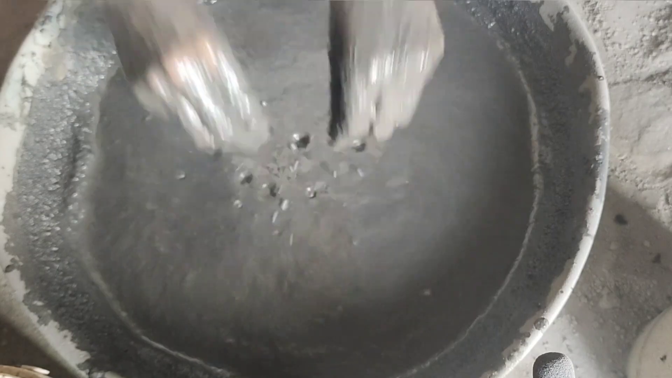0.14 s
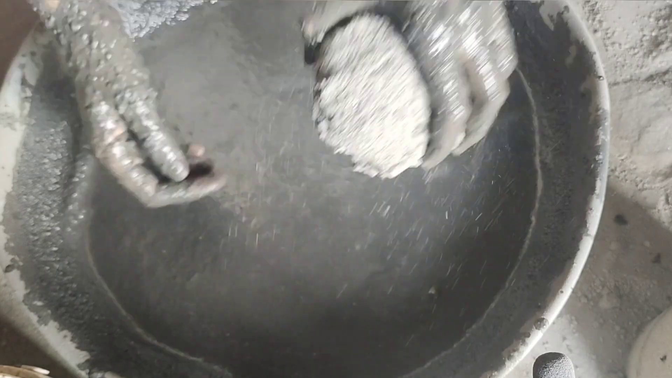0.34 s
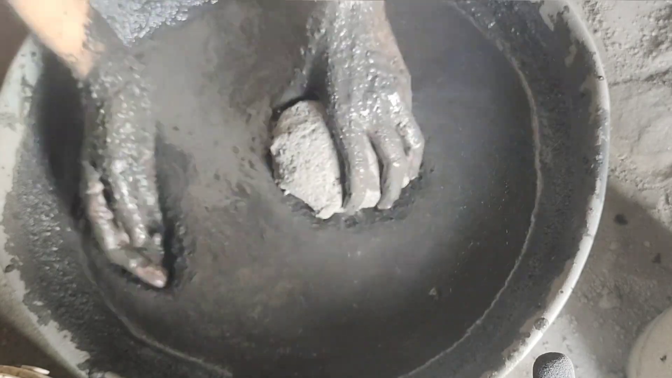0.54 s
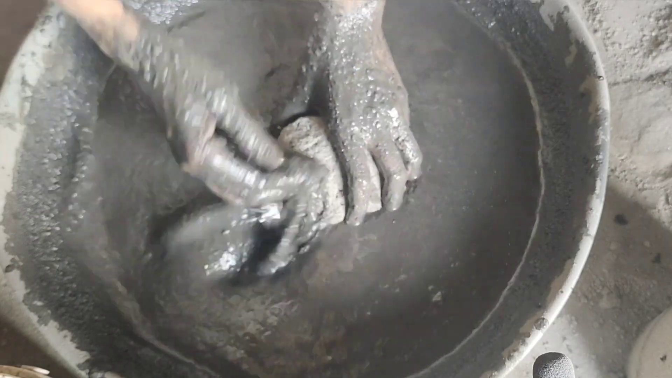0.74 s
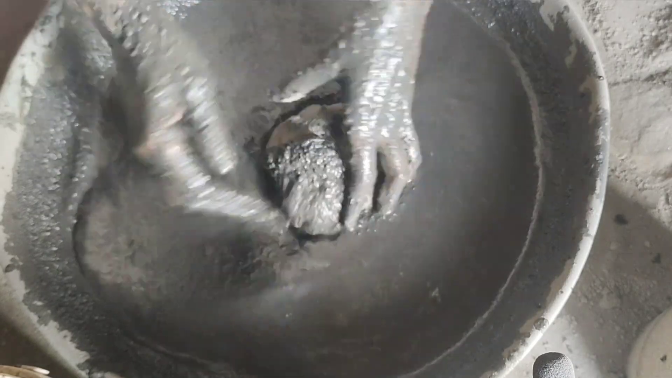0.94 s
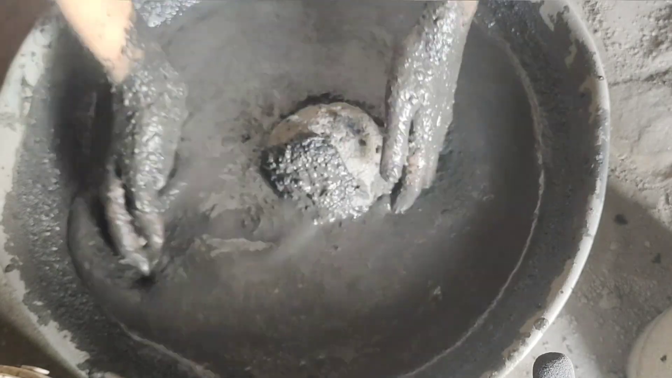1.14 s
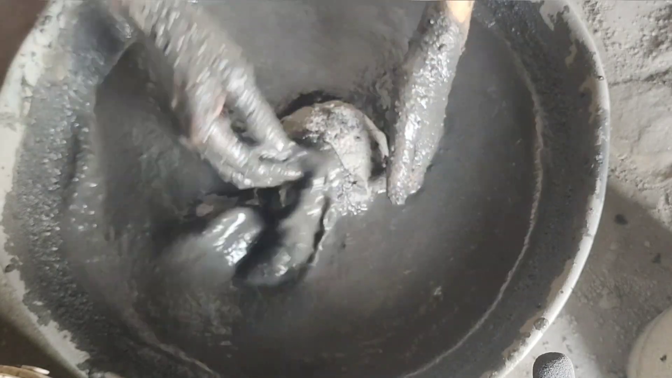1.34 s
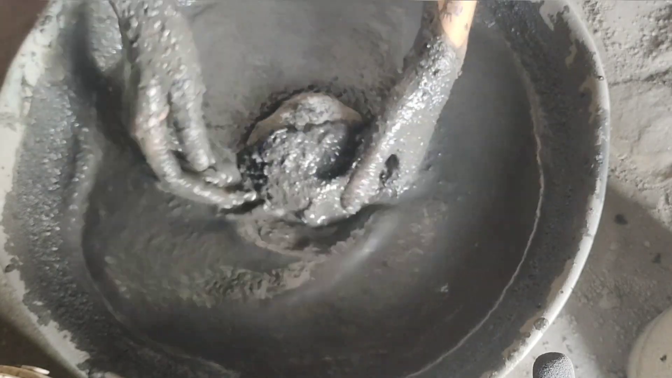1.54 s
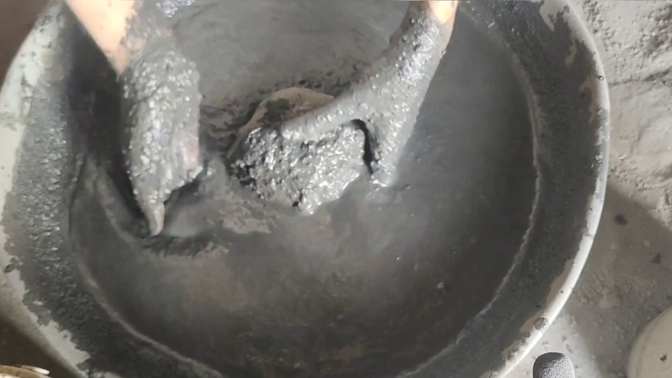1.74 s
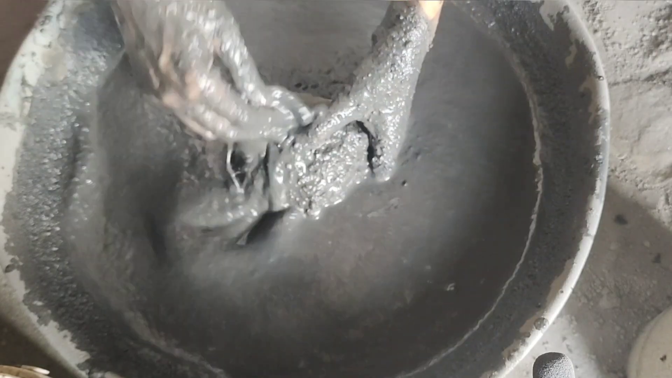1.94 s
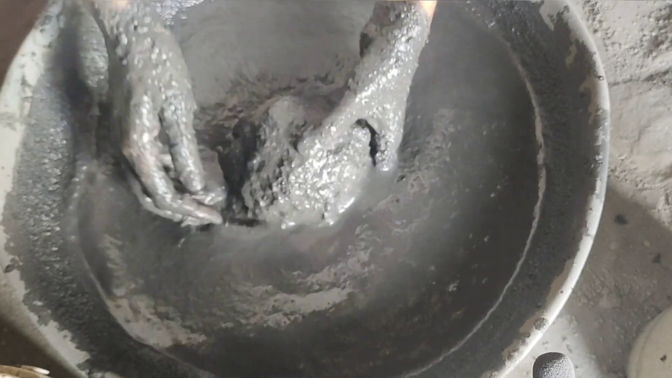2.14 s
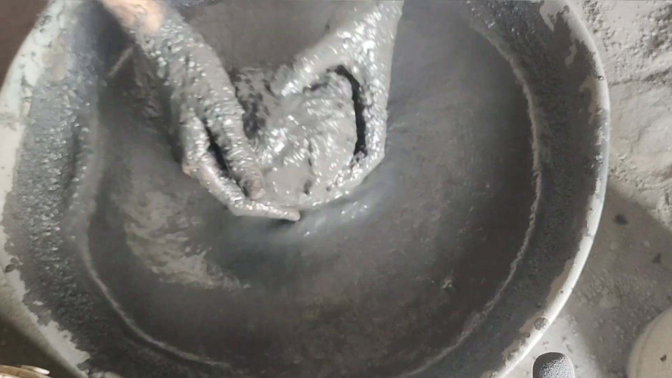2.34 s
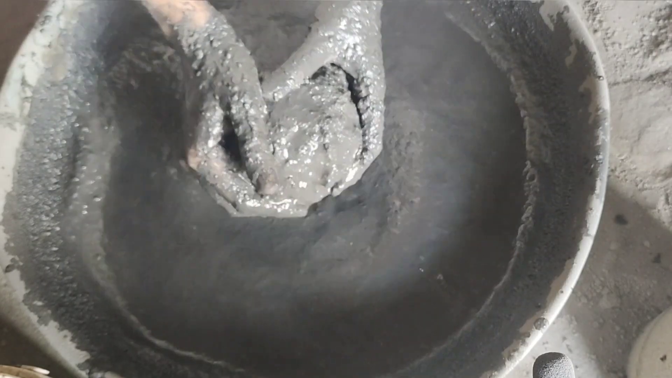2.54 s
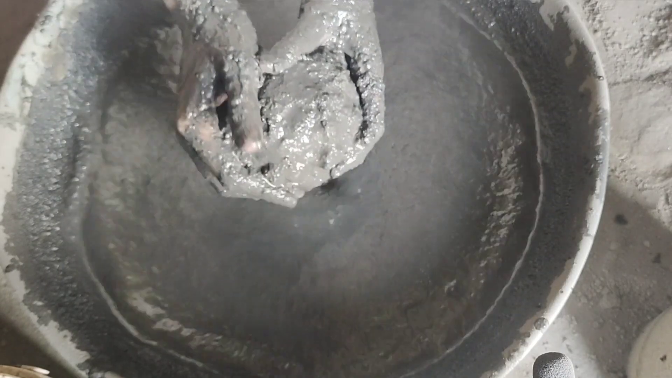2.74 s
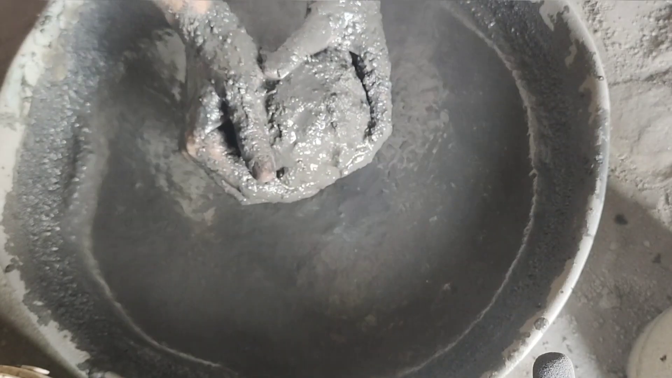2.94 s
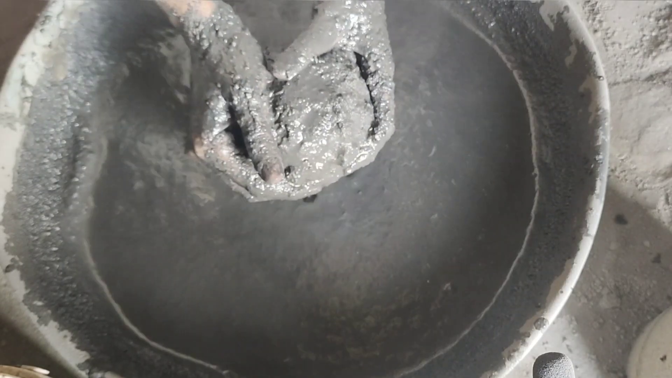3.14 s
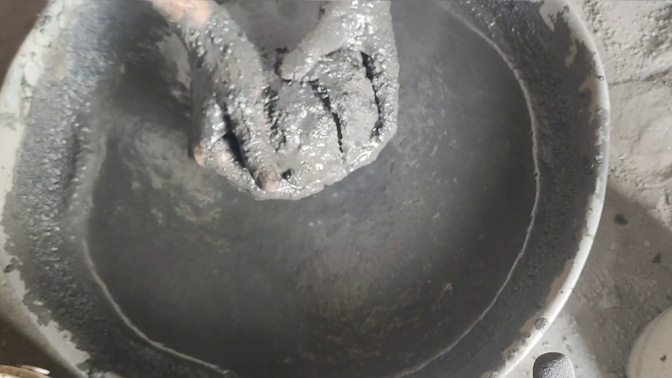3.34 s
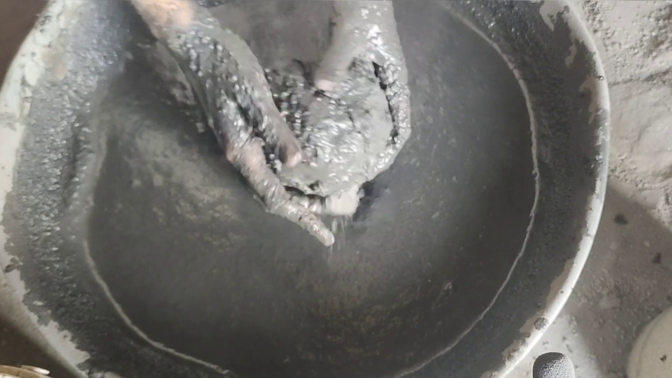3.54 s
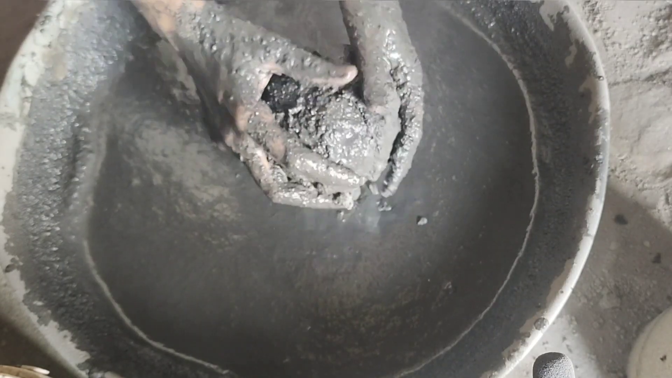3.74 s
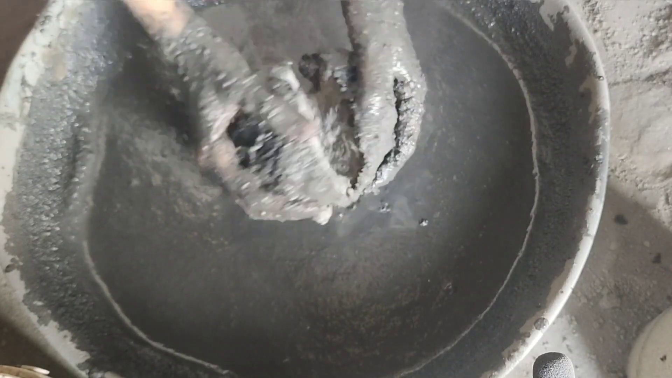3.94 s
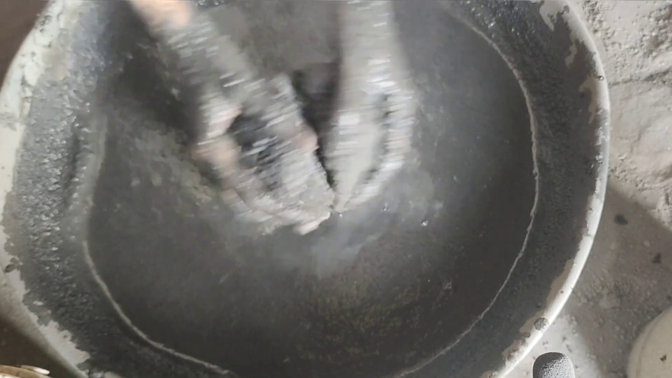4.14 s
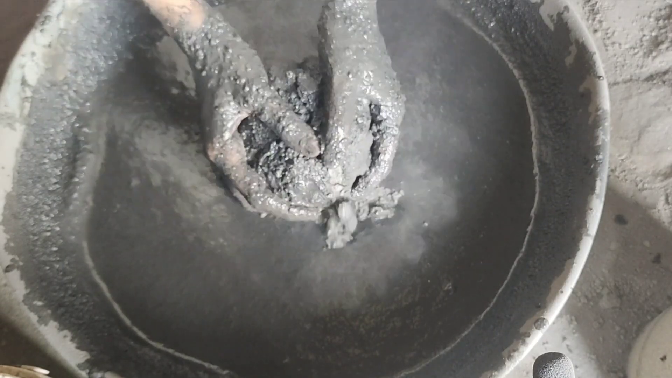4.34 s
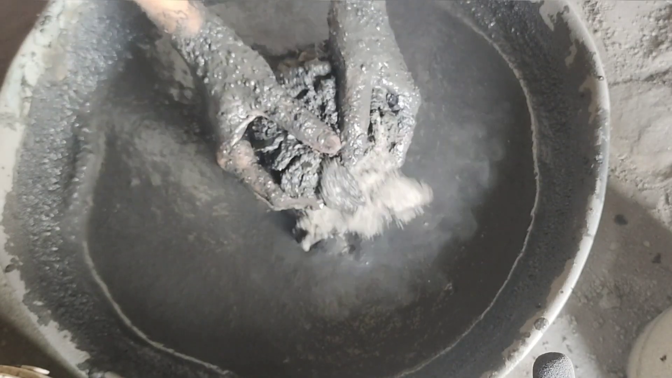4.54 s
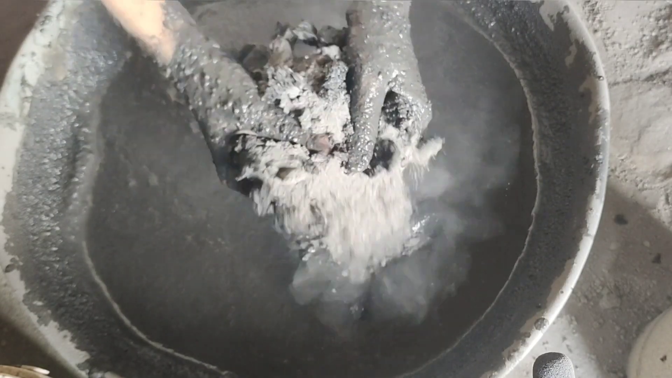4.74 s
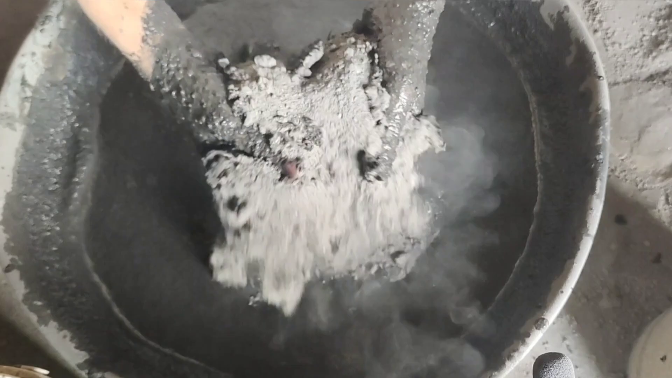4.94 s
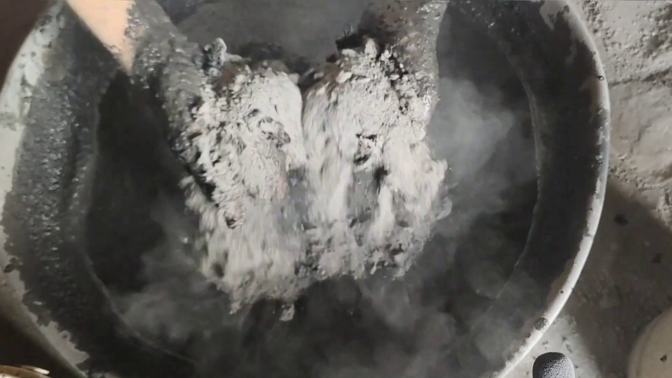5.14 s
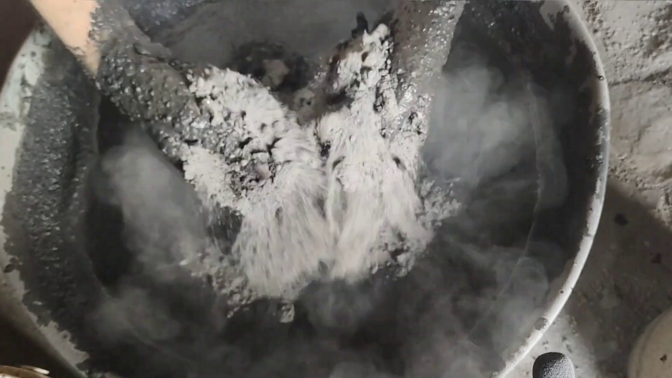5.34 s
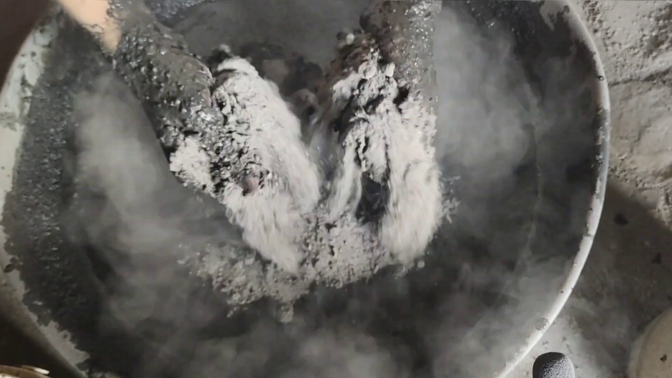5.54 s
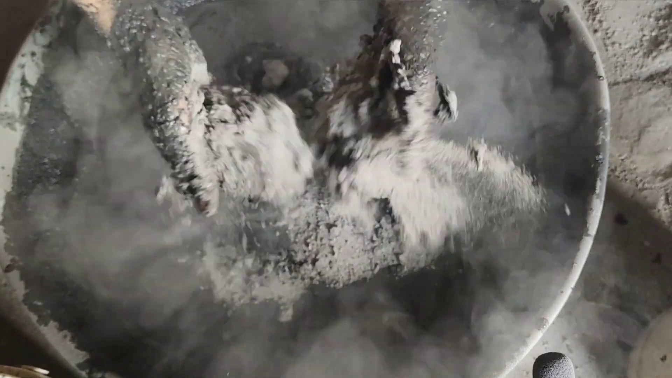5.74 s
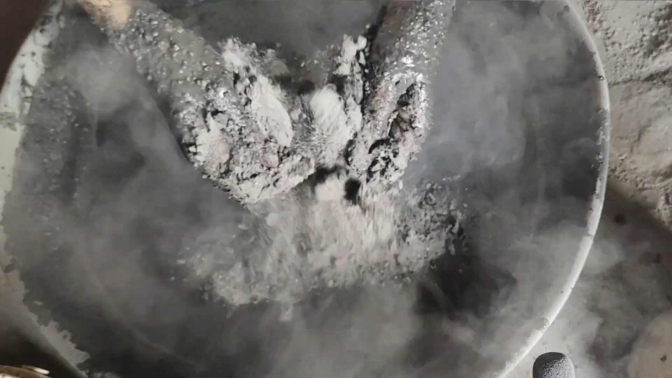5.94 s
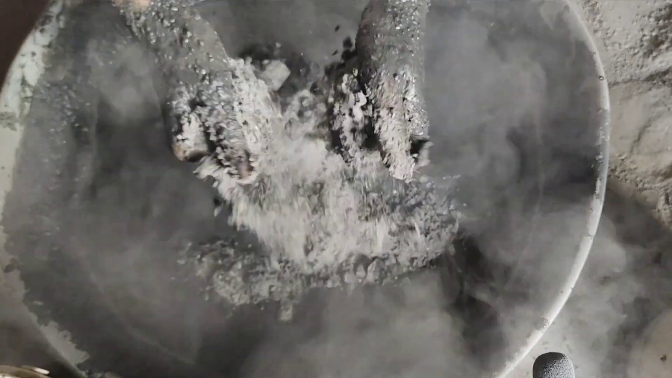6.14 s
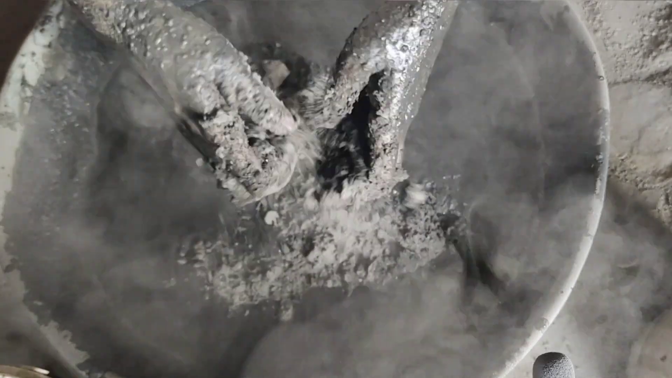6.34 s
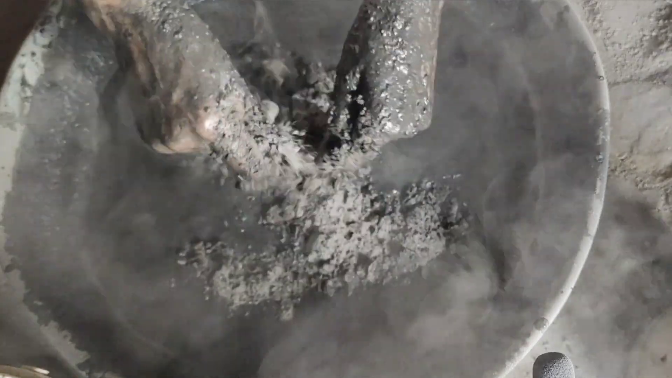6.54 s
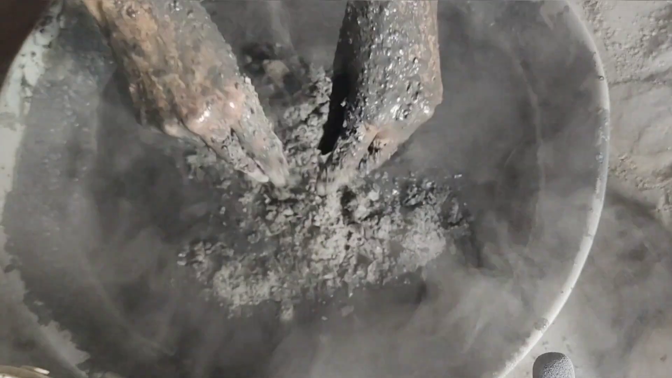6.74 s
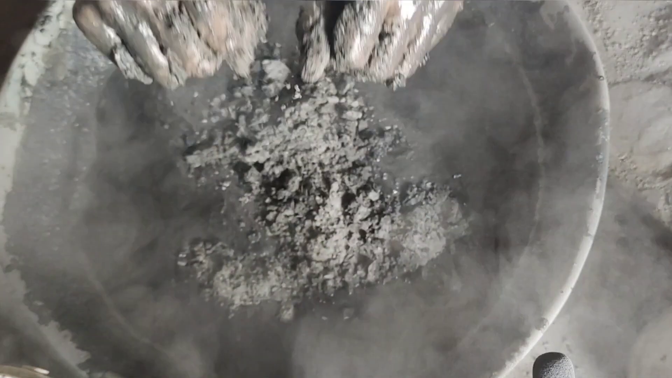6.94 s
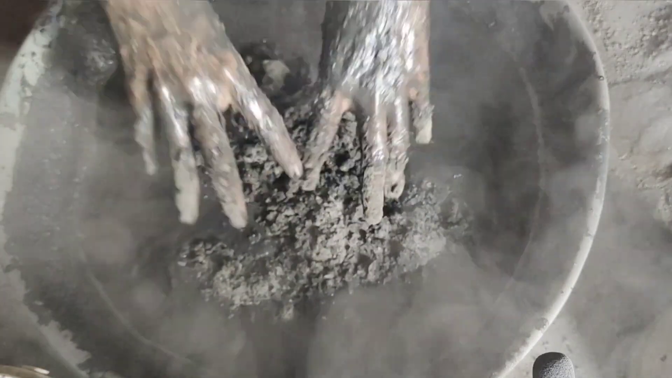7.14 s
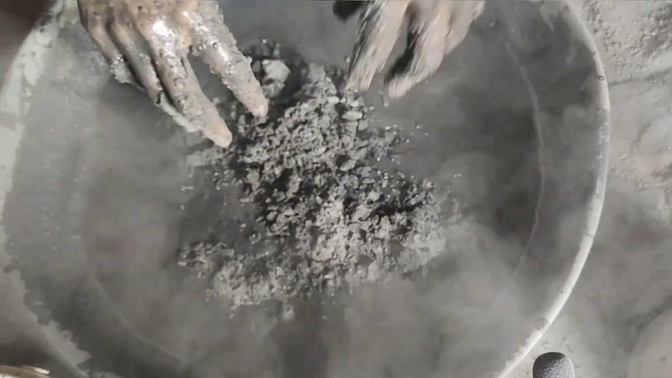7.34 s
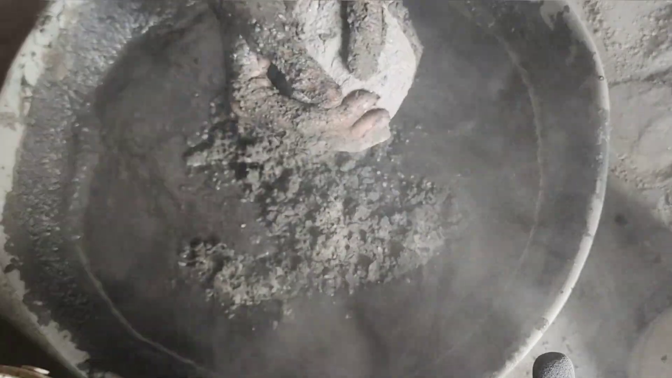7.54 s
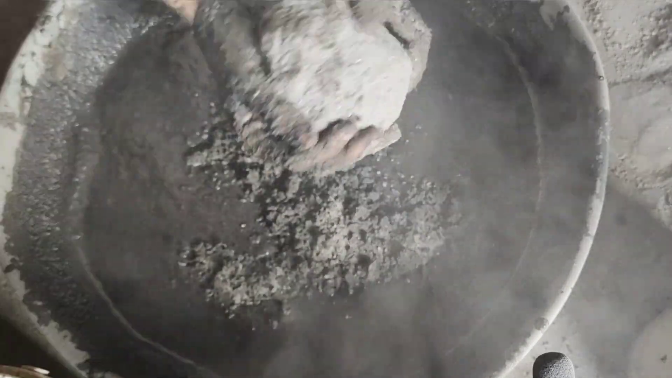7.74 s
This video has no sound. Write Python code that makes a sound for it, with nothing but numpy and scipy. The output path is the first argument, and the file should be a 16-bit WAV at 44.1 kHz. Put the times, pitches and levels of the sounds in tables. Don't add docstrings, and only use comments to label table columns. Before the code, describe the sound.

In a wide basin outdoors, wet sandy paste is scraped and pressed in brisk, snapping strokes for about three seconds. Then dry squeezing begins, grains crackle, a lump drops with a dull thud, and sandy powder spills in rustling waves with small pebble clicks, ending sparse. Small close microphone, crisp treble, little reverberation, low distant hum.

```python
import sys
import numpy as np
from scipy import signal
from scipy.fft import rfft, irfft, next_fast_len
from scipy.io import wavfile
from scipy.ndimage import uniform_filter1d, map_coordinates

SR = 44100
rng = np.random.default_rng(int(sys.argv[2]) if len(sys.argv) > 2 else 0)


def generate_wav(sig):
    pcm = np.round(np.clip(np.atleast_2d(sig).T, -1, 1) * 32767).astype(np.int16)
    wavfile.write(sys.argv[1], SR, pcm)


def volts(x):
    e = np.asarray(x, float) / 20
    return 10 ** e


N = 347508


def unit(x):
    return x / np.sqrt(np.mean(x ** 2) + 1e-20)


def curves(rows):
    s, *cols = np.transpose(rows)
    return [np.interp(np.arange(N) / SR, s, c) for c in cols]


def wobble(rate_hz):
    knots = rng.standard_normal(int(N * rate_hz / SR) + 4)
    return map_coordinates(knots, [np.arange(N) * rate_hz / SR])


def filtered(x, response):
    m = next_fast_len(len(x) + 8192)
    spectrum = rfft(x, m) * response(np.fft.rfftfreq(m, 1 / SR))
    return irfft(spectrum, m)[:len(x)]


def modes(table):
    def response(f):
        total = 0
        for k, (hz, width_hz, db) in enumerate(table):
            damping = 1j * f * width_hz
            total = total + (-1) ** k * volts(db) * damping / (hz * hz - f * f + damping)
        return total
    return response


def band(x, low_hz, high_hz):
    edges_hz = [low_hz, min(high_hz, SR / 2.1)]
    sos = signal.butter(2, edges_hz, "bandpass", fs=SR, output="sos")
    return unit(signal.sosfilt(sos, x))


def grains(count, spread_db, bed):
    size_db = spread_db * np.minimum(rng.exponential(size=count), 4.3)
    sizes = volts(size_db) * rng.uniform(-1, 1, count)
    fractures = np.bincount(rng.integers(0, N, count), sizes, N)
    return unit(fractures) + bed * rng.standard_normal(N)


def strokes(rows):
    t = np.arange(N) / SR
    levels_db = []
    for s, db, swell, hold, fade in rows:
        below_db = np.maximum(swell * (s - t), fade * (t - s - hold)).clip(0)
        levels_db.append(db - below_db)
    return np.max(levels_db, axis=0)


def yard():
    # pitch_hz, width_hz, level_db
    hum_modes = [(57.6, 21.4, -8), (96.3, 10.5, -1.5), (130.9, 19.5, -3), (175.16, 6.6, 1), (212, 21.5, -3),
                 (254.3, 37, -11), (297.3, 20.5, -9), (332.7, 7.6, -7.5), (359.2, 11, -10),
                 (424.6, 24.7, -9), (517, 99, -24.5)]
    # freq_hz, level_db_per_hz
    air_spectrum = [(25, -16), (48, -19), (75, 0.5), (300, -10.5), (500, -9), (900, -17), (1500, -21),
                    (4000, -29), (9000, -32), (16000, -29)]
    response = modes(hum_modes)
    hum = unit(filtered(rng.standard_normal(N), lambda f: np.abs(response(f)) ** 1.664))
    hum *= volts(-36.0 + 0.83 * wobble(3.13))
    hz, db = np.transpose(air_spectrum)
    air = filtered(rng.standard_normal(N), lambda f: volts(np.interp(np.log(f + 1), np.log(hz), db)))
    return hum + volts(-46.5) * unit(air)


def scooping():
    # start_s, level_db, swell_db_per_s, hold_s, fade_db_per_s
    scoops = [
        (0.06, -48, 100, 0.13, 130),
        (0.11, -44, 150, .008, 300),
        (0.466, -54.5, 900, .002, 95),
        (0.74, -46, 2500, .002, 290),
        (0.83, -47.5, 130, .15, 70),
        (2.75, -49, 140, 0.033, 90),
        (2.92, -56, 500, .002, 100),
    ]
    # pitch_hz, width_hz, level_db
    cup = [(1450, 54, 1.5), (1740, 150, 0), (2077, 92, -0.5)]
    hollow = filtered(grains(count=20000, spread_db=5.5, bed=1.0), modes(cup))
    return unit(hollow) * volts(strokes(scoops) + 4.0)


def pockets():
    # start_s, peak_db, pitch_hz
    bursts = [(0.2393, -15, 5400), (0.467, -22, 4800), (1.57, -30, 2300), (1.703, -25, 2630),
              (1.716, -24, 3000), (1.733, -22, 5200), (2.152, -33, 1390), (2.257, -32, 1060),
              (2.432, -24, 760), (2.765, -42, 1450), (3.605, -24, 2100), (3.607, -23, 670),
              (5.155, -34, 1040)]
    out, t = np.zeros(N), np.arange(SR // 20) / SR
    for s, db, hz in bursts:
        cycles = hz * t
        tone = np.sin(2 * np.pi * cycles * (1 + 0.004 * cycles))
        envelope = volts(db - 1.8 * cycles) * (1 - np.exp(-cycles))
        out[round(s * SR):][:len(t)] += envelope * tone
    return out


def thud():
    # pitch_hz, level_db, t60_s
    basin = [(177, -24, 0.21), (213.5, -21, 0.4), (248, 8, 0.024), (295, -24, 0.24), (353, -11.5, 0.08),
             (522, -10, 0.038), (790, -11.5, 0.03), (1420, -5, 0.015)]
    start_s, attack_s = 4.4735, 0.0005
    t = np.arange(SR // 2) / SR
    ring = -sum(volts(db - 60 * t / t60) * np.sin(2 * np.pi * hz * t) for hz, db, t60 in basin)
    blow = band(rng.standard_normal(len(t)), low_hz=107, high_hz=373)
    boom = volts(-16.5 - 60 * t / 0.5) * band(blow, low_hz=107, high_hz=373)
    spray = volts(-15.5 - 60 * t / 0.052) * band(rng.standard_normal(len(t)), low_hz=496, high_hz=10200)
    out = np.zeros(N)
    out[round(start_s * SR):][:len(t)] = volts(-2) * (1 - np.exp(-t / attack_s)) * (ring + boom + spray)
    return out


def snaps():
    # start_s, peak_db, depth_db, sparkle_db, t60_s
    cracks = [(0.1126, -23, -24, -10, .0083), (0.221, -15, -37, -12, .023), (0.2291, -13, -27.5, -7, 0.045),
              (0.2344, -8, -47, -6, .008), (0.225, -13, -41, -25, .008), (0.3617, -10, -23, -2.5, .012),
              (0.468, -6, -26, -4.5, 0.0084), (0.7389, -9, -19.5, -20, 0.047),
              (0.7457, -12, -17, -2, 0.021), (0.9875, -12.5, -30, -10, 0.045),
              (1.0965, -11.5, -10.5, -7, 0.017), (1.2782, -0.5, -28, -13, 0.014),
              (1.2816, -10, -20, -4, 0.019), (1.572, -9, -19, -2, 0.0061), (1.5782, -8, -21.5, -11, 0.025),
              (1.8462, -12.5, -38, -31, 0.0053), (2.4326, -6.5, -7, -18, .006),
              (2.6346, -16, -36, -3, .019), (3.607, -16, -5, -15, 0.012), (3.6093, -18.5, -2.5, -7, 0.03),
              (4.4806, -12, -9.5, -5, .0089), (4.969, -9, -23, -3, 0.023), (5.1427, -6, -18, -1, .021),
              (5.147, -10.5, -16, 0.5, .008)]
    # start_s, peak_db, depth_db, sparkle_db
    ticks = [(0.253, -24, -25, -15), (0.3139, -20, -25, -14), (0.456, -21, -40, -24),
             (0.5624, -37.5, -2, 10), (0.624, -22.5, -36, -11), (0.7534, -18, -22, -15),
             (0.7608, -18, -36, -27), (1.2683, -18, -26, -4), (1.3427, -28, -27, -19), (1.384, -27, -24, 3),
             (1.7007, -18, -36, -9), (1.7226, -17, -20, -9), (1.735, -18, -26, -15),
             (2.0573, -22, -34, -10), (2.11, -17, -32, -13), (2.1997, -25, -24, 3), (2.226, -29, -19, 2),
             (2.2468, -15, -20, -5), (3.6173, -15, -14.5, -11), (3.7779, -16, -20.5, -10),
             (4.3498, -24.5, -30, -4), (4.446, -26, -29, -9), (4.6372, -22, -13, -10),
             (5.47, -18, -31, -17), (6.5773, -24, -30, -9), (6.934, -25.5, -12, -13),
             (7.3037, -21, -28, -1), (7.4275, -16.5, -21, -11), (7.466, -21.5, -23, -20),
             (7.753, -26.5, -27, -13)]
    # start_s, peak_db
    pebbles = [
        (0.3046, -33),
        (0.6339, -32),
        (2.2826, -29),
        (2.2952, -25),
        (4.8106, -27),
        (4.9768, -19),
        (5.5546, -25),
        (7.5123, -29),
    ]
    tick_t60_s = 0.023
    breaks = []
    for s, db, depth_db, sparkle_db, t60 in cracks + [(*row, tick_t60_s) for row in ticks]:
        crumb_db = -5 + 0.46 * depth_db
        breaks.append((s, db, depth_db, crumb_db, sparkle_db, t60))
    for s, db in pebbles:
        breaks.append((s, db, -11, -2, -13, 0.021))

    out, lead, size = np.zeros(N + SR), 200, 2600
    t = (np.arange(size) - lead) / SR
    for s, db, knock_db, crumb_db, dust_db, t60 in breaks:
        clumps_db = 3.6 * rng.standard_normal(size // 20).repeat(20)
        crackle = rng.standard_normal(size) * volts(clumps_db)
        crackle[lead] = 6
        crackle *= volts(np.where(t < 0, -8 + 60 * t / .011, -60 * t / max(t60, .002)))
        # level_db, low_hz, high_hz
        parts = [(-8, 5000, 9800), (knock_db, 480, 2300), (crumb_db, 2200, 4900), (dust_db - 2, 9500, 16000)]
        for part_db, low_hz, high_hz in parts:
            part = band(crackle, low_hz, high_hz)
            part *= volts(db + part_db + 3.0) / np.abs(part).max()
            out[max(round(s * SR) - lead, 0):][:size] += part
    return out[:N]


def kneading():
    # start_s, resting_rustle_db, coarse_share_db, fine_share_db
    paste = [(0.0, -37, -26, -11.5), (0.46, -42.5, -19, -6), (0.476, -62, 0, -5), (0.6, -62, -5, -9),
             (0.645, -49, -7.5, -7), (0.725, -48, -9.5, -11), (1.1, -38.5, -12, -11),
             (2.1, -43, -13.5, -10), (2.6, -42, -10, -10.5), (3.39, -40, -9, -11),
             (3.41, -47.5, -11.5, -10), (3.7, -51, -8.5, -12.5), (3.82, -49, -14.5, -7),
             (4.45, -48, -13, -8), (4.85, -41, -7, -7), (6.5, -41, -14.5, -9.5), (7.2, -50, -14, -5),
             (7.88, -49, -11.5, -8.5)]
    # start_s, level_db, swell_db_per_s, hold_s, fade_db_per_s
    smears = [(0.0, -31, 900, .002, 125), (0.225, -28.5, 290, .012, 153), (0.735, -26.5, 2500, .015, 144),
              (0.87, -35, 80, .09, 100), (0.986, -28.5, 180, .01, 200), (1.05, -31.5, 100, .03, 200),
              (1.094, -29.5, 200, .008, 210), (1.2, -36.5, 80, .05, 100), (1.274, -32, 200, .01, 200),
              (1.37, -35.5, 90, .13, 52), (1.57, -30.5, 85, .012, 100), (1.72, -28, 132, .012, 168),
              (1.85, -37, 88, .008, 120), (2.15, -30, 100, .06, 120), (2.28, -36.5, 100, .25, 50),
              (2.6, -35, 43, .04, 100), (2.76, -34, 55, .05, 37), (2.955, -32.5, 105, .02, 82),
              (3.04, -36, 100, .07, 45), (3.535, -42.5, 200, .035, 250), (3.603, -33.5, 2500, .05, 320)]
    # start_s, level_db, swell_db_per_s, hold_s, fade_db_per_s
    squeezes = [(3.783, -34, 170, .03, 50), (3.872, -31, 80, .025, 85), (3.985, -36.5, 100, .14, 54),
                (4.363, -40.5, 180, 0.036, 110), (4.482, -34.5, 750, 0.028, 100),
                (4.65, -35.5, 200, .2, 35), (4.895, -29, 65, .02, 45), (5.15, -30.5, 165, 0.013, 120),
                (5.273, -30, 45, 0.13, 40), (5.663, -32.5, 35, .15, 35), (5.857, -31, 35, 0.054, 35),
                (6.0, -32, 100, .035, 90), (6.23, -28.5, 56, .15, 52), (6.5, -34, 100, .03, 40),
                (6.77, -32.5, 47, 0.087, 200), (6.967, -34, 95, .008, 180), (7.026, -40, 100, .07, 50),
                (7.3, -42, 200, .03, 60), (7.401, -34.5, 150, .012, 320), (7.457, -43.5, 200, .015, 300),
                (7.52, -43.5, 140, .16, 100), (7.71, -41.5, 65, .02, 45)]
    # start_s, level_db, swell_db_per_s, hold_s, fade_db_per_s
    pour = [
        (4.52, -50.5, 500, .08, 50),
        (4.65, -43, 300, .1, 19),
        (4.95, -46, 30, .46, 80),
        (5.66, -48, 80, .3, 100),
        (6.22, -48, 130, .2, 70),
        (6.74, -56, 130, .1, 150),
    ]
    # pitch_hz, width_hz, level_db
    bowl = [(2030, 90, -9), (2360, 80, -11)]
    slither_db, slither_s = -8, 0.13
    patter_over_pour_db, pour_lightens_db, first_rush_ends_s = 2.5, 5.5, 4.92

    rest_db, crumb_db, dust_db = curves(paste)
    grit_db = np.maximum(rest_db, strokes(smears + squeezes))
    sand = volts(.7 * wobble(35) + 1.3 * wobble(120)) * grains(count=20000, spread_db=3.2, bed=1.15)
    lumps = volts(1.5 * wobble(40)) * grains(count=20000, spread_db=3, bed=.9)
    bowl_response = modes(bowl)
    falling = filtered(lumps + 0.95 * sand, lambda f: 1 + np.abs(bowl_response(f)))

    pour_db = strokes(pour)
    lightening = np.interp(np.arange(N) / SR, [pour[1][0], first_rush_ends_s], [0, 1])
    patter_db = pour_db + patter_over_pour_db + pour_lightens_db * lightening
    coarse_db = np.maximum(crumb_db, patter_db - grit_db) + 3.5
    crumbs = volts(coarse_db) * band(falling, low_hz=1790, high_hz=5830)
    grit = volts(-5) * band(sand, low_hz=4530, high_hz=10650)
    dust = volts(dust_db + 4.0) * band(sand, low_hz=8340, high_hz=16470)

    slide_db = uniform_filter1d(grit_db + crumb_db, round(slither_s * SR)) + slither_db
    slither = volts(np.maximum(slide_db, pour_db) + 2.5) * band(lumps, low_hz=544, high_hz=2120)
    return volts(grit_db - 1.0) * (crumbs + grit + dust) + slither


def scene():
    mono = yard() + scooping() + pockets() + thud() + snaps() + kneading()
    return np.array([mono, mono])


def band_limit(x):
    return signal.sosfilt(signal.butter(12, 16200, fs=SR, output="sos"), x)


def record(dry):
    port = modes([(7053, 740, 12.87)])

    def microphone(f):
        bass_cut = (1j * f / (50 + 1j * f)) ** 3
        top_cut = (f < 15650) / (1 + (f / 15300) ** 24)
        return (1 + port(f)) * bass_cut * top_cut

    heard = np.array([filtered(x, microphone) for x in dry])
    return band_limit(np.clip(heard, -1, 1))


dry = scene()
out = record(dry)
generate_wav(out)
```